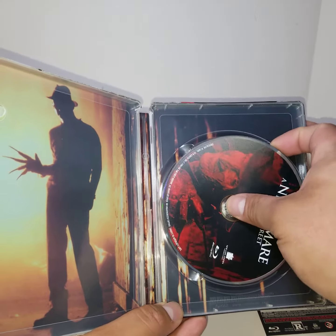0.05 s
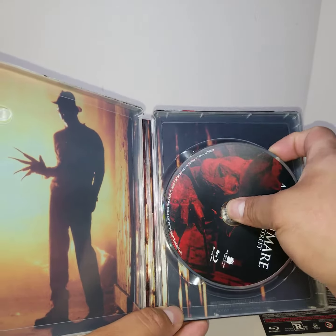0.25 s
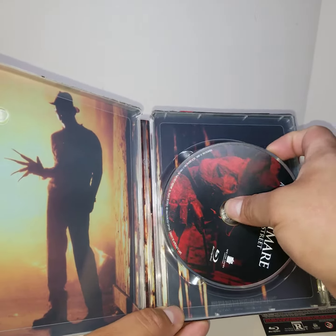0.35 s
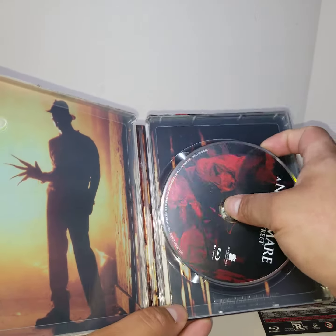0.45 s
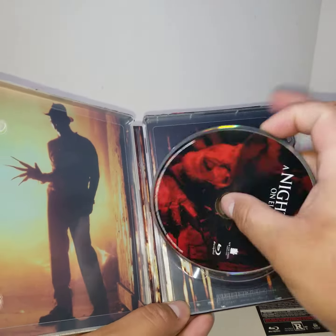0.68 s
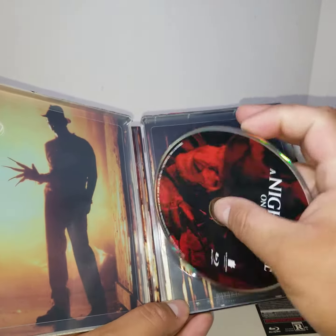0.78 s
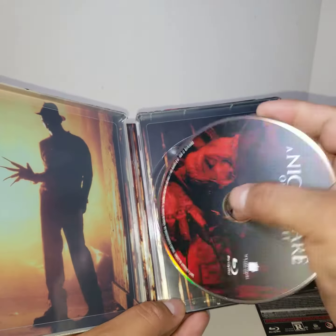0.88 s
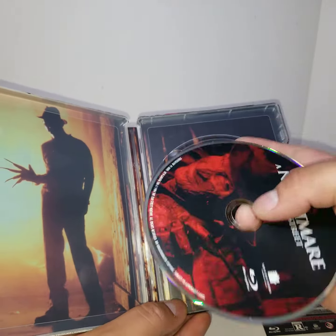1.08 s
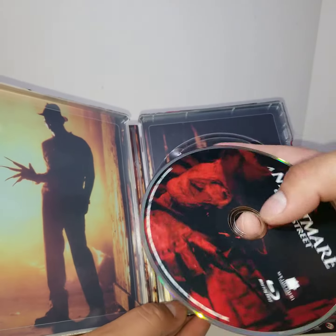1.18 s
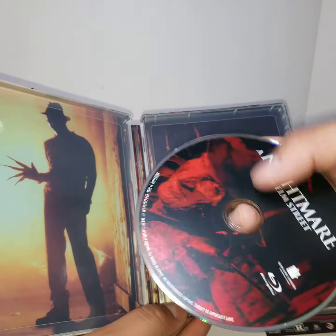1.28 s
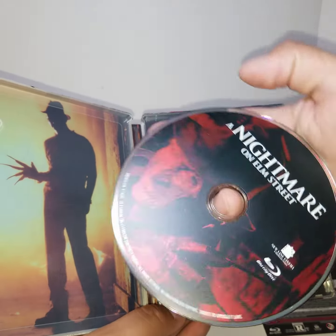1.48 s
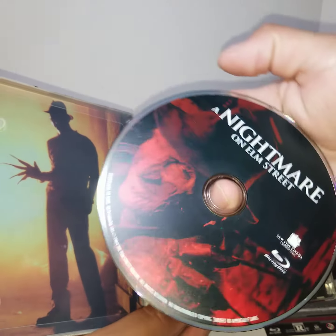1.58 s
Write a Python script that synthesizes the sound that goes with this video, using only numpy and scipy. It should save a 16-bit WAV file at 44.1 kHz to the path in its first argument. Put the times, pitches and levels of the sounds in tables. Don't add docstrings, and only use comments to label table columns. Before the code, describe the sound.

A disc snaps loudly from its plastic hub at about 0.23 seconds, two crackling bursts within 0.03 seconds, bright with a hollow tray knock. A soft low case thump and faint thin ringing follow, with a short room answer. Light ticks patter from 0.63 to 0.77, then a barely audible finger brush near 1.0. Soft room hiss dips after the snap and rises again by 1.5.

```python
import sys
import numpy as np
from scipy import signal
from scipy.fft import rfft, irfft
from scipy.io import wavfile

SR = 44100
rng = np.random.default_rng(int(sys.argv[2]) if len(sys.argv) > 2 else 0)


def boost(x):
    u = np.asarray(x, float) / 20
    return 10 ** u


def master(y):
    cut = np.clip(np.atleast_2d(y).T, -1, 1)
    pcm = np.round(cut * 32767)
    wavfile.write(sys.argv[1], SR, pcm.astype(np.int16))


N = 72765

# [t/s, level/dB]
NOISE_LEVEL = [(0, -39), (.03, -39.5), (.2, -38.5), (.3, -41), (.4, -44.5), (.55, -48.5), (.7, -49),
               (.8, -51.5), (1.05, -51.5), (1.28, -52.5), (1.38, -50), (1.47, -45), (1.6, -43),
               (1.65, -42.5)]
# [f/Hz, level/dB per Hz]
AIR_COLOUR = [(30, -11), (220, -7), (900, -9), (2500, -14.5), (6000, -24.5), (9200, -38.5), (10500, -52.5),
              (16000, -52.5)]
# [f/Hz, width/Hz, level/dB]
ROOM_HUM = [(146.7, 56, 4.5), (233.7, 52, 5.5), (335, 66, 3.5), (545, 21, 5.5), (654, 44, 5)]
# [t/s, length/s, f/Hz, level/dB]
DRONES = [
    (.58, 0.17, 545, -56.5),
    (1.001, 0.27, 335, -55.5),
]
# [f/Hz, t60/s]
ROOM_T60 = [(120, .35), (400, .3), (1000, .26), (2500, .27), (5000, .24), (9000, .24), (14000, .28)]
# [f/Hz, level/dB]
ROOM_COLOUR = [(120, 12), (500, -24.5), (1500, -12.5), (2500, -9.5), (5000, -8.5), (8000, -7),
               (11000, -7.5), (15000, -17)]
# [t/s, length/s, level/dB]
BRUSHES = [
    (.62, 0.026, -72),
    (0.974, .1, -69.5),
]
# [f/Hz, level/dB, t60/s]
FREE_DISC = [(558, -42.5, 0.46), (1172, -44.5, 0.23), (2424, -36.5, 0.23), (2516, -40.5, 0.18),
             (3215, -44, .24), (3634, -43.5, .22)]
# [f/Hz, level/dB per Hz]
CRACK_COLOUR = [(300, -13.5), (1200, -5.5), (3500, -3), (6000, -8), (8500, -13), (12000, -36), (15500, -38)]
# [f/Hz, level/dB, t60/s]
DISC_ON_HUB = [(1890, -10, .012), (2250, -8, .015), (2490, -2, .018), (2950, -5, .015), (3250, -9, .012),
               (3800, -10, .007), (4300, -12, .007), (4860, -5, .012), (5650, -13, .009), (6100, -17, .009),
               (7000, -23, .004), (8200, -30, .002), (11300, -39, .002), (14500, -43, .0015)]
# [f/Hz, level/dB, t60/s]
HELD_DISC = [(2560, 2, .012), (3250, 0, 0.0091), (3980, 2, .006), (5100, -5, .005), (5860, -11.5, 0.0053),
             (7220, -13.5, 0.0088), (8270, -22.5, 0.0081), (11500, -26, 0.0041), (14000, -32, .003)]
# [f/Hz, level/dB, t60/s]
TRAY = [(230, -27, .04), (465, -12.5, 0.019), (907, -4.5, .012), (1370, -10.5, 0.0073)]
# [t/s, level/dB, brightness/dB per octave, knock on the tray/dB]
TICKS = [(.6325, -52, -4, -20), (.6365, -54, 0, -20), (.6612, -35, 1, -20), (.6617, -33, 1, -20),
         (.6983, -39, 4, -20), (.7111, -38, 2, -20), (.7356, -45, -3, -20), (.7672, -51, 2, -20)]
# [t/s, level/dB, brightness/dB per octave, knock on the tray/dB]
SLIPS = [(.2294, -8.5, -5.5, -5.5), (.2302, -14, 7, 0.5), (.2311, -6.5, 0.5, 1.5), (.2317, -8, 6.5, 1.5),
         (.2331, -11.5, -10.5, -4.5), (.2342, -12.5, -12.5, -1.5), (.2358, -34, 4, -19.5),
         (.2392, -15.5, -4.5, -3.5), (.2422, -14, 2, -31), (.2443, -16, -2, -10), (.2462, -5, 2, 2),
         (.2469, -8, 5.5, 6.5), (.2490, -17, 5, -6.5), (.2518, -13.5, -4, -6), (.2578, -16.5, 1, -3)]


def rms_one(x):
    return x / np.sqrt(np.mean(x ** 2) + 1e-20)


def at_hz(points, hz):
    table_hz, value = np.transpose(points)
    return np.interp(np.log(hz), np.log(table_hz), value)


def bandpass(x, order, low_hz, high_hz):
    return signal.sosfilt(signal.butter(order, [low_hz, high_hz], "band", fs=SR, output="sos"), x)


def spectrum_hz():
    return np.maximum(np.arange(N // 2 + 1) * SR / N, 10)


def coloured_noise(colour_db):
    return rms_one(irfft(rfft(rng.standard_normal(N)) * boost(colour_db), N))


def clicks_at(times_s, heights):
    clicks = np.zeros(N)
    np.add.at(clicks, (times_s * SR).astype(int), heights)
    return clicks


def ring(clicks, hz, t60):
    decay = boost(-60 / (t60 * SR))
    turn = 2 * np.pi * hz / SR
    return signal.lfilter([0, np.sin(turn)], [1, -2 * decay * np.cos(turn), decay ** 2], clicks + 1e-18)


def room_noise():
    hz = spectrum_hz()
    colour_db = at_hz(AIR_COLOUR, hz)
    for peak_hz, width_hz, db in ROOM_HUM:
        colour_db = colour_db + db / (1 + (2 * (hz - peak_hz) / width_hz) ** 2)
    s, level_db = np.transpose(NOISE_LEVEL)
    return coloured_noise(colour_db) * boost(np.interp(np.arange(N) / SR, s, level_db))


def drones():
    width_hz = 12
    t, out = np.arange(N) / SR, 0
    for s, length, hz, db in DRONES:
        once = ring(rng.standard_normal(N), hz, 2.2 / width_hz)
        narrow = ring(once, hz, 2.2 / width_hz)
        swell = np.sin(np.pi * np.clip((t - s) / length, 0, 1))
        out = out + boost(db) * swell * rms_one(narrow)
    return out


def room(x):
    wall_delay_s, build_up_s = .006, .0024
    t = np.arange(SR // 2) / SR
    white = rng.standard_normal((2, len(t)))
    edges_hz = 66 * 2 ** np.arange(0, 8.3, .5)
    echo = 0
    for k, (low, high) in enumerate(zip(edges_hz, edges_hz[1:])):
        hz = np.sqrt(low * high)
        band = bandpass(white[k % 2], 2, low, high)
        echo = echo + band * boost(at_hz(ROOM_COLOUR, hz) - 60 * t / at_hz(ROOM_T60, hz))
    build_up = 1 - np.exp(-np.maximum(t - wall_delay_s, 0) / build_up_s)
    echo = echo * build_up / np.sqrt(SR / 100)
    return signal.fftconvolve(x, echo)[:N]


def brushes():
    t = np.arange(N) / SR
    shape = 0
    for s, length, db in BRUSHES:
        shape = shape + boost(db) * np.sin(np.pi * np.clip((t - s) / length, 0, 1)) ** 2
    return shape * rms_one(bandpass(rng.standard_normal(N), 4, 4500, 9500))


def thump():
    start_s, level_db, hz, t60_s, rise_s = .262, -28.5, 75, .12, .006
    t = np.maximum(np.arange(N) / SR - start_s, 0)
    return boost(level_db - 60 * t / t60_s) * (1 - np.exp(-t / rise_s)) * np.sin(2 * np.pi * hz * t)


def freed_disc():
    freed_s = .247
    click = clicks_at(np.array([freed_s]), 1)
    return sum(boost(db) * ring(click, hz, t60) for hz, db, t60 in FREE_DISC)


def crack(rows):
    level_db, t60_s = -13, .01
    s, db = np.transpose(rows)[:2]
    clicks = clicks_at(s, boost(db + level_db))
    shape = signal.lfilter([1], [1, -boost(-60 / (t60_s * SR))], clicks + 1e-18)
    return shape * coloured_noise(at_hz(CRACK_COLOUR, spectrum_hz()))


def contacts(rows, disc):
    spread_db = 3
    s, db, tilt_db, knock_db = np.transpose(rows)
    luck = rng.uniform(-1, 1, (len(rows), len(disc) + len(TRAY)))
    out = np.zeros(N)
    for k, (hz, level_db, t60) in enumerate(disc + TRAY):
        if k < len(disc):
            extra_db = tilt_db * np.log2(hz / 2500)
        else:
            extra_db = knock_db
        strength = boost(db + level_db + extra_db + spread_db * luck[:, k])
        out += ring(clicks_at(s, strength * (-1) ** k), hz, t60)
    return bandpass(out, 2, 191, 13000)


def scene():
    snap = contacts(SLIPS, DISC_ON_HUB) + crack(SLIPS)
    ticks = contacts(TICKS, HELD_DISC) + crack(TICKS)
    answer = room(snap + boost(-8) * ticks)
    background = room_noise() + drones()
    handling = brushes() + thump() + freed_disc()
    return (background + answer + handling + ticks + snap)[None]


def low_pass(x):
    return signal.sosfilt(signal.butter(12, 16370, fs=SR, output="sos"), x)


def record(dry):
    rounded = .96 * dry / (1 + np.abs(dry) ** 4) ** .25
    treble_cut = signal.cheby2(12, 70, 16600, fs=SR, output="sos")
    mix = signal.sosfilt(treble_cut, rounded)
    return low_pass(mix)


dry = scene()
out = record(dry)
master(out)
```